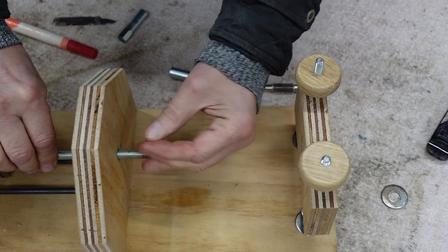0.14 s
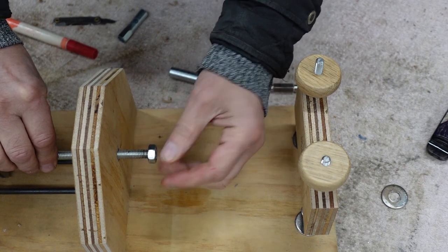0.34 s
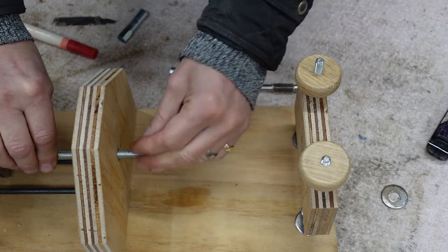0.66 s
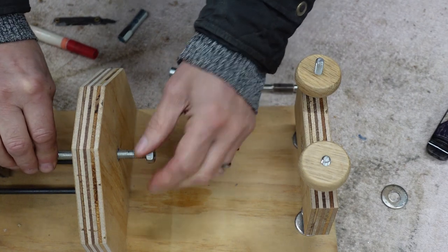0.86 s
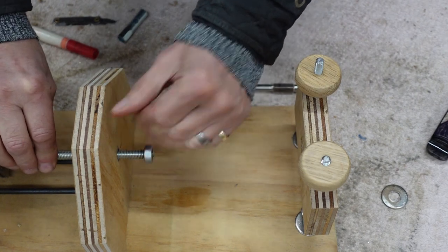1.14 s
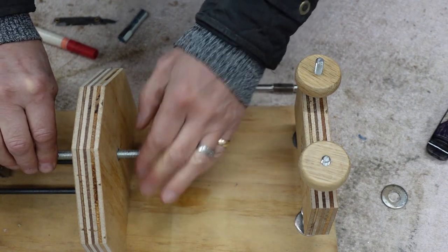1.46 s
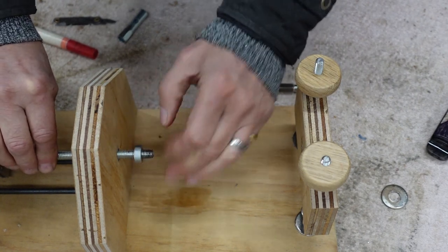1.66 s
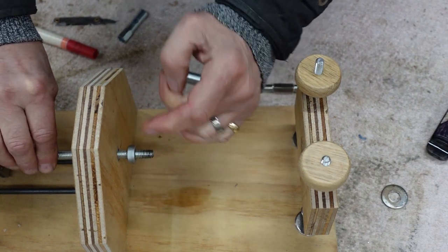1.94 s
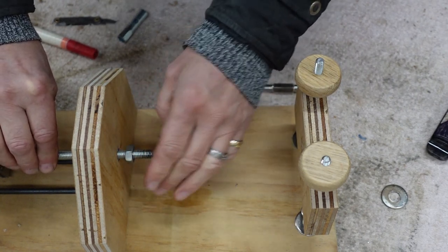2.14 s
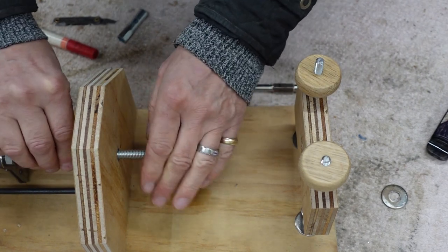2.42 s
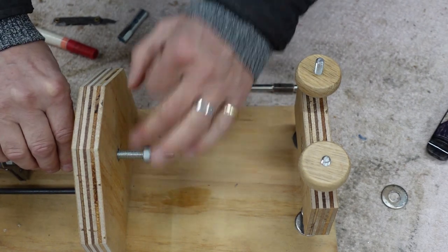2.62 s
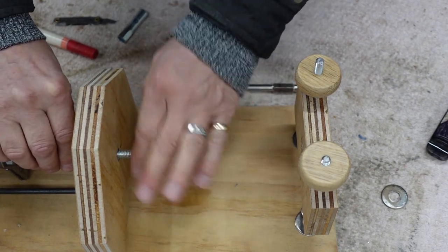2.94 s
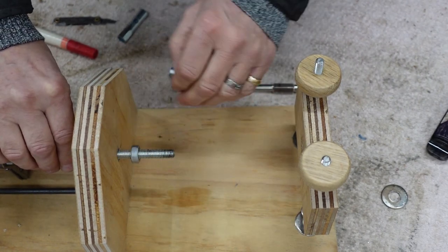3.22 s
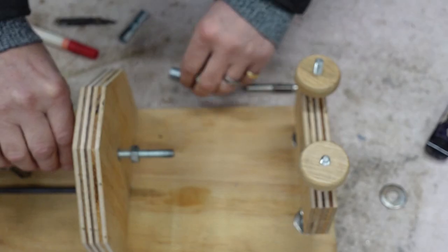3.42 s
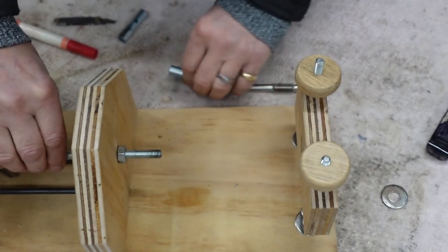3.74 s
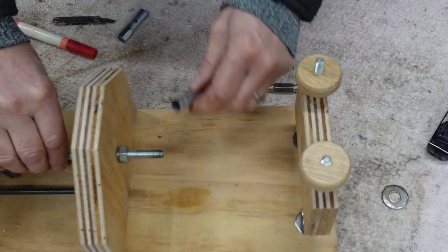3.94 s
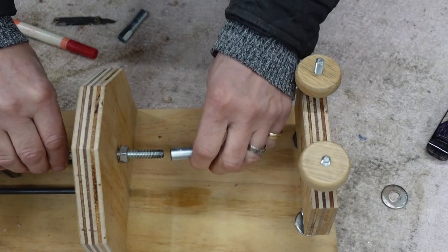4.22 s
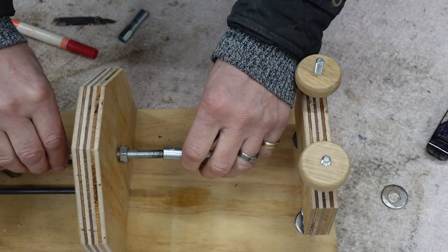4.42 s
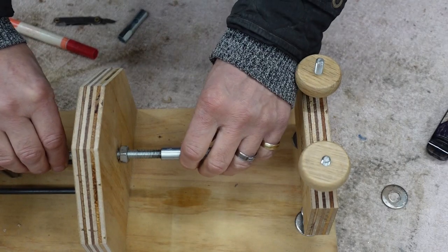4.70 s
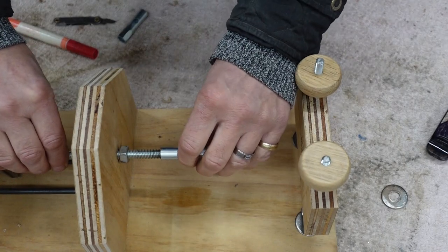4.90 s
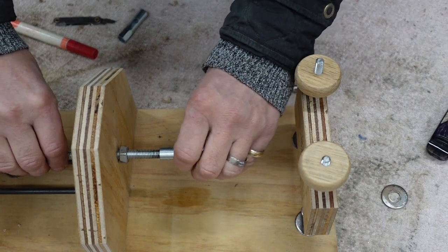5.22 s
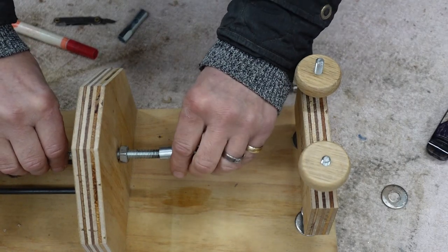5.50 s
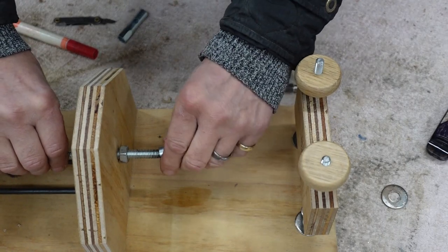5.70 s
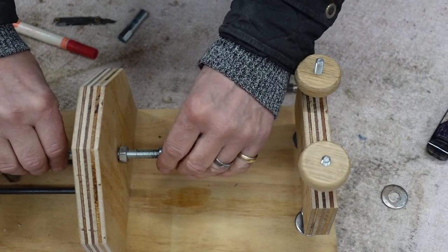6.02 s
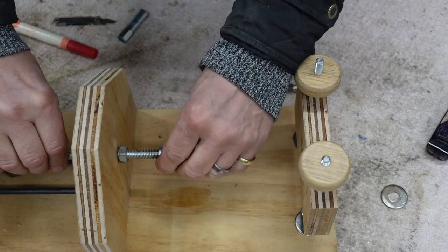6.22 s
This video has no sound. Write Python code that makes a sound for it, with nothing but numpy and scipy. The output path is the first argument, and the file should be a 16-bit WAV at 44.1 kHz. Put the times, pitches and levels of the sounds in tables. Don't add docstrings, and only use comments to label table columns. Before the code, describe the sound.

Bursts of metallic chatter from a nut spinning on a rod, each a brief pitched whirr with wooden knocks and crisp ticks. They peak before two seconds, then pause for clicks and gritty rubs. Lower, looser spins follow, then a hard click and quiet handling, ending with a sharp steel clack. Close stereo microphones, short live echoes, soft room noise.

```python
import sys
import numpy as np
from scipy import signal
from scipy.fft import rfft, irfft, next_fast_len
from scipy.io import wavfile

SR = 44100
rng = np.random.default_rng(int(sys.argv[2]) if len(sys.argv) > 2 else 0)


def convert_level_to_amplitude(level_db):
    exponent = np.asarray(level_db, float) / 20
    return 10 ** exponent


def file_out(sig):
    cols = np.atleast_2d(sig).T
    lim = np.clip(cols, -1, 1)
    pcm = np.round(lim * 32767).astype(np.int16)
    wavfile.write(sys.argv[1], SR, pcm)


N = 280035

# pitch_hz, width_hz, level_db
BOARDS = [(650, 136, -2.5), (880, 53, -13.5), (1326.5, 63, 5), (1597, 340, -4)]
# pitch_hz, width_hz, level_db
STEEL_LOW = [(2233, 400, 6), (2735, 400, 9.5), (3024, 1010, 6)]
STEEL_MAIN = [(4047, 180, -9.5), (4855, 300, 6.5), (5490, 210, -41)]
STEEL_HIGH = [(6040, 1500, -5.5), (6340, 650, 4), (7686, 440, 1.5)]
STEEL_TOP = [(8770, 680, -3.5), (9880, 450, -4.5), (10480, 1040, -0.5), (14730, 910, -11.5)]


def evened(x):
    return x / np.sqrt(np.mean(x ** 2) + 1e-20)


def peaked(x, db):
    return convert_level_to_amplitude(db) * x / abs(x).max()


def read(points, hz):
    f, value = np.transpose(points)
    return np.interp(np.log(hz + 1), np.log(f + 1), value)


def coloured(x, db_table, share):
    size = next_fast_len(x.shape[-1])
    gain = convert_level_to_amplitude(share * read(db_table, np.fft.rfftfreq(size, 1 / SR)))
    return irfft(rfft(x, size) * gain, size)[..., :x.shape[-1]]


def add(mix, s, sound):
    part = mix[..., round(s * SR):][..., :sound.shape[-1]]
    part += sound[..., :part.shape[-1]]


def mode(x, hz, width):
    r = np.exp(-np.pi * abs(width) / SR)
    push = [(1 - r * r) / 2, 0, (r * r - 1) / 2]
    return signal.lfilter(push, [1, -2 * r * np.cos(2 * np.pi * hz / SR), r * r], x)


def steep(x, hz, width, skirt=2.8):
    return mode(mode(x, hz, width), hz, skirt * width)


def resonate(x, hz, width):
    turn = np.exp(2j * np.pi * np.cumsum(hz * np.ones(len(x))) / SR)
    r = np.exp(-np.pi * abs(width) / SR)
    return 2 * (turn * signal.lfilter([1 - r], [1, -r], x / turn + 1e-18)).real


def body(x, modes):
    return sum((-1) ** k * convert_level_to_amplitude(db) * steep(x, f, w) for k, (f, w, db) in enumerate(modes))


def blow(contact_s, scuff=0.41):
    t = np.arange(2000) / SR
    rough = rng.standard_normal(len(t)) * np.sqrt(t) * np.exp(-t / contact_s)
    return signal.unit_impulse(len(t), idx=12) + scuff * rough / abs(rough).max()


def stroke(t, start, length, db, hz, loss_db):
    attack_s, release_db_per_s = 0.03, 370
    gone = np.clip((t - start) / length, 0, 1)
    rise = np.clip((t - start) / attack_s, 0, 1)
    level_db = db - loss_db * gone - release_db_per_s * np.maximum(t - start - length, 0)
    return (rise * convert_level_to_amplitude(level_db)) ** 2, hz, gone


def hand():
    # start_s, length_s, level_db, rod_note_hz, loss_by_end_db
    spins = [(0.001, 0.063, -52, 730, 0.5), (0.197, 0.089, -41.5, 840, -1.5),
             (0.594, 0.17, -43.5, 814, -5.5), (0.726, 0.092, -37, 844, 9), (1.064, 0.12, -39.5, 876, -3.5),
             (1.173, 0.21, -33.5, 910, 4.5), (1.513, 0.32, -28, 940, 8.5), (1.838, 0.26, -29.5, 955, 7.5),
             (2.137, 0.093, -41.5, 854, 11), (2.603, 0.49, -41.5, 612, 7), (2.995, 0.24, -40, 598, 12),
             (3.217, 0.13, -49.5, 530, 6.5)]
    # start_s, length_s, level_db, rod_note_hz, thump_db
    grips = [(1.009, 0.082, -48.5, 850, -42), (2.257, 0.09, -37, 806, -9), (3.507, 0.15, -49, 500, -13.5),
             (3.762, 0.093, -64, 700, -14), (3.917, 0.075, -61.5, 700, -9),
             (4.425, 0.174, -59.5, 640, -1.5), (4.74, 0.03, -39, 788.4, -8.5), (4.786, 0.28, -61, 670, -22),
             (5.192, 0.11, -56.5, 605, -3.5), (5.686, 0.029, -52, 620, -2.5), (5.888, 0.12, -59, 600, -4.5)]
    rest_db, rest_hz = -77, 700
    climb = 0.22
    spin_steel_db, spin_dulls = -9, 1.59
    spin_rumble_db, spin_thump_db = -15, -32
    loose_db_per_octave = 10.5
    grip_steel_db, grip_rumble_db, grip_loss_db = -11.5, -3, 1.5
    t = np.arange(0, N / SR + .01, .001)
    flat = np.ones(len(t))
    power = [convert_level_to_amplitude(2 * rest_db) * flat]
    colour = [[rest_hz * flat, -16 * flat, grip_rumble_db * flat, -8 * flat]]
    for row in spins:
        p, hz, gone = stroke(t, *row)
        loss_db = row[-1]
        loose_db = loose_db_per_octave * np.log2(950 / hz) * flat
        note = hz * (1 + climb * np.log2(hz / 620) * (gone - .5))
        steel_db = spin_steel_db - spin_dulls * (loss_db * gone - min(loss_db, 0)) + loose_db
        power.append(p)
        colour.append([note, steel_db, spin_rumble_db + loose_db, spin_thump_db * flat])
    for *row, thump_db in grips:
        p, hz, gone = stroke(t, *row, grip_loss_db)
        power.append(p)
        colour.append([hz * flat, grip_steel_db * flat, grip_rumble_db * flat, thump_db * flat])
    total = np.sum(power, axis=0)
    mean = np.einsum("st,sct->ct", power, colour) / total
    return [np.interp(np.arange(N) / SR, t, c) for c in (10 * np.log10(total), *mean)]


def chatter(level_db, rod_hz, bright_db, rumble_db, thump_db, per_s=380, spread_db=2.5, scrape=0.36):
    # pitch_hz, width_hz, level_db
    rumble_modes = [(253, 41, -1.5), (335.7, 43.6, -1), (458, 89, 3.5)]
    sizes = convert_level_to_amplitude(spread_db * np.minimum(rng.exponential(1, N), 3)) * (rng.random(N) < per_s / SR)
    blows = evened(sizes * rng.choice([-1., 1.], N)) + scrape * rng.standard_normal(N)
    grit = signal.lfilter([1], [1, -np.exp(-1 / (0.0018 * SR))], sizes) * rng.standard_normal(N)
    grit = evened(grit) + 0.7 * rng.standard_normal(N)
    shaking = resonate(blows, rod_hz, 427)
    ridge = convert_level_to_amplitude(3) * (620 / rod_hz) ** 4 * resonate(shaking, rod_hz, 70)
    boards = convert_level_to_amplitude(0.5) * body(shaking, BOARDS) * (rod_hz / 900) ** 0.22
    low = evened(ridge + resonate(shaking, rod_hz, 260) + boards)
    grip_db = 12 * np.log2(rod_hz / 900) - 6
    steel = convert_level_to_amplitude(grip_db) * body(grit, STEEL_LOW) + body(grit, STEEL_MAIN)
    steel = evened(steel + convert_level_to_amplitude(-6.0) * body(grit, STEEL_HIGH) + convert_level_to_amplitude(-15.5) * body(grit, STEEL_TOP))
    rumble = convert_level_to_amplitude(rumble_db) * evened(body(blows, rumble_modes))
    thump = convert_level_to_amplitude(thump_db) * evened(steep(blows, 154.4, 70))
    return convert_level_to_amplitude(level_db - 3.5) * (low + convert_level_to_amplitude(bright_db) * steel + rumble + thump)


def knocks(rod_hz):
    # start_s, peak_db
    slap_table = [(0.222, -35), (0.261, -36.5), (0.595, -36.5), (0.639, -33.5), (0.756, -31.5), (0.83, -46),
                  (1.108, -32.5), (1.168, -29), (1.243, -27.5), (1.289, -26), (1.321, -30), (1.541, -26.5),
                  (1.719, -25.5), (1.859, -17.5), (1.917, -21.5), (1.982, -19.5), (2.088, -23.5),
                  (2.641, -39), (2.693, -29), (2.789, -37.5), (2.813, -33), (2.839, -30), (2.945, -31),
                  (3.026, -29.5), (3.069, -31), (3.118, -37), (3.15, -44), (3.194, -32), (3.265, -35)]
    # start_s, peak_db, pitch_hz
    bumps = [(0.043, -44, 650), (0.549, -49, 695), (1.025, -35, 820), (1.497, -29.5, 770),
             (2.257, -36.5, 1030), (2.285, -33.5, 530), (2.592, -46, 692), (3.522, -36.5, 1590),
             (3.583, -36, 470), (4.456, -42.5, 705), (4.496, -44.5, 590), (4.546, -40, 575),
             (4.761, -32.5, 650), (5.214, -37, 1024), (5.249, -39, 371), (5.421, -44, 1510),
             (5.7, -47, 403), (5.96, -44, 580), (6.171, -45, 604), (6.2, -50.5, 218)]
    detune = 0.04
    thud_hz, thud_db = 190, -24
    out = np.zeros(N)
    chance = rng.uniform(-1, 1, len(slap_table))
    slaps = [(s, db, rod_hz[round(s * SR)] * (1 + detune * c)) for (s, db), c in zip(slap_table, chance)]
    push = signal.unit_impulse(1800)
    for s, db, hz in slaps + bumps:
        shaking = mode(mode(push, hz, 780), hz, 430)
        note = peaked(mode(shaking, hz, 115) + convert_level_to_amplitude(-11) * body(shaking, BOARDS), db - 1.0)
        thud = peaked(steep(push, thud_hz, 172), db + thud_db)
        add(out, s, rng.choice([-1., 1.]) * (note + thud))
    return out


def ticks(rod_hz):
    # start_s, peak_db, top_end_db
    thread_table = [(0.2214, -28.5, -15.5), (0.2618, -24.5, -20), (0.7457, -31, -23), (1.1588, -22.5, -25),
                    (1.2491, -27.5, -23), (1.5995, -16.5, -8.5), (1.6351, -25, -7), (1.6774, -37, -8),
                    (1.727, -25.5, -12.5), (1.8585, -19.5, -11.5), (2.0136, -24, -8), (2.0557, -26.5, -8),
                    (2.63, -36, -4), (2.6471, -24, -7), (2.7322, -36, -2), (2.751, -31, -12),
                    (2.7881, -32.5, -11), (2.8384, -26, -15.5), (2.9547, -34, -35), (2.9936, -23, -19),
                    (3.032, -19, -18), (3.0455, -19, -10), (3.093, -24.5, -23), (3.1417, -28.5, -34),
                    (3.1707, -24, -21), (3.1966, -30, -25), (3.2777, -36.5, -47)]
    # start_s, peak_db, low_note_hz, low_note_db, top_end_db
    part_ticks = [(0.602, -47, 2800, 5, -30), (0.6402, -40.5, 2250, 6, -40), (1.0248, -22, 2210, -8, -21.5),
                  (1.497, -22.5, 3140, -2, -18), (2.259, -34, 2650, 2, -22), (2.2706, -26, 3020, 5.5, -15),
                  (2.2943, -19, 2780, -24, -19), (2.3659, -16, 3380, -5, -18.5),
                  (2.59, -40.5, 2100, 1, -26), (3.5203, -22.5, 3140, 2.5, -13.5),
                  (3.676, -11, 2110, -16.5, -33), (4.007, -46.5, 3500, -6, -15), (4.456, -47, 2940, 4, -35),
                  (4.5461, -41, 2780, 2, -35), (4.753, -39, 3640, -1, -32), (4.772, -21, 2850, -2, -23.5),
                  (5.1943, -43.5, 2900, -2.5, -27), (5.2134, -52, 1960, 7, -8),
                  (5.249, -24.5, 2780, -2, -15.5), (5.4194, -28, 3280, 0.5, -35),
                  (5.6982, -38, 2780, 0.5, -17), (5.91, -47, 3300, 5.5, -38), (6.043, -50, 2850, -2, -34)]
    thread_hz, detune, thread_low_db = 2850, 0.076, -9
    high_start_db, high_share = 1, 0.51
    crack_db = -15.5
    out = np.zeros(N)
    chance = rng.uniform(-1, 1, (len(thread_table), 2))
    thread = []
    for (s, db, top_db), (a, b) in zip(thread_table, chance):
        hz = thread_hz * (900 / rod_hz[round(s * SR)]) ** 0.43 * (1 + detune * a)
        thread.append((s, db, hz, thread_low_db + 4 * b, top_db))
    for s, db, hz, low_db, top_db in thread + part_ticks:
        high_db = high_start_db + high_share * top_db
        force = blow(0.0023)
        low = peaked(steep(force, hz, 260) + convert_level_to_amplitude(-14) * body(force, STEEL_LOW), low_db)
        high = peaked(body(force, STEEL_HIGH), high_db) + peaked(body(force, STEEL_TOP), top_db)
        rest = np.sqrt(max(1 - convert_level_to_amplitude(2 * low_db) - convert_level_to_amplitude(2 * high_db), .03))
        main = rest * peaked(body(force, STEEL_MAIN), 0)
        crack = peaked(steep(force, 3100, 7500, 0.51), crack_db + 0.45 * top_db)
        add(out, s, convert_level_to_amplitude(db - 9.0) * (low + main + high + crack))
    return out


def sleeve(grind_s=0.007, grind_db=-4):
    # start_s, peak_db
    hits = [(6.171, -11.5)]
    # pitch_hz, width_hz, level_db
    sleeve_modes = [(988, 120, -15), (1590, 310, -4), (2160, 590, -2), (3155, 300, 4.5), (3780, 240, -10),
                    (4460, 260, -5.5), (5086, 250, -3.5), (5760, 380, -6), (6404, 220, -3.5),
                    (7620, 620, -7.5), (8670, 260, -14), (10100, 840, -23), (12100, 1600, -23),
                    (14840, 960, -9)]
    out, turns = np.zeros(N), rng.standard_normal(2000)
    for s, db in hits:
        clack = np.zeros(SR // 20)
        for (hz, width, g), turn in zip(sleeve_modes, turns):
            u = np.arange(0, 1, width / 1.63 / SR)
            swell = u ** .5 * (1 - u) ** 1.2
            tone = np.sin(2 * np.pi * (hz * np.arange(len(u)) / SR + turn))
            add(clack, 0, convert_level_to_amplitude(g) * swell * tone)
        u = np.arange(0, 1, 1 / (grind_s * SR))
        grind = steep(np.sin(np.pi * u) * turns[-len(u):], 6000, 14000, 1.2)
        add(out, s, peaked(clack, db - 6))
        add(out, s, peaked(grind, db - 13.5 + grind_db))
    return out


def drag():
    # start_s, length_s, level_db, pitch_hz
    slides = [(2.232, 0.15, -45.5, 2700), (2.272, 0.093, -44, 1420), (2.5, 0.12, -63, 1760),
              (3.522, 0.15, -54.5, 950), (4.75, 0.05, -47.5, 1370), (4.8, 0.15, -64, 1750),
              (3.545, 0.15, -57, 2880), (4.8, 0.039, -59.5, 1360), (4.763, 0.022, -60, 12400)]
    out = np.zeros(N)
    for s, length, db, hz in slides:
        u = np.arange(0, 1, 1 / (length * SR))
        grit = rng.standard_normal(SR // 2)[:len(u)] ** 3
        rub = evened(resonate(resonate(grit, hz, 190), hz, 700))
        add(out, s, convert_level_to_amplitude(db) * np.sin(np.pi * u) ** 0.8 * rub)
    return out


def chimes():
    # start_s, peak_db, fade_s (time to drop 60 dB)
    rings = [
        (2.2948, -55.5, 0.92),
        (2.366, -40.5, 0.29),
        (3.675, -47, 0.31),
    ]
    nut_hz = (11172, 11339)
    nut_db = (0, -2)
    out, t = np.zeros(N), np.arange(SR // 2) / SR
    pair = sum(convert_level_to_amplitude(g) * np.sin(2 * np.pi * hz * t) for hz, g in zip(nut_hz, nut_db))
    for s, db, t60 in rings:
        add(out, s, peaked(pair * convert_level_to_amplitude(-60 * t / t60) * np.minimum(t / .001, 1), db + 2))
    return out


def shop(x, first_s=.0055):
    # pitch_hz, fade_s (time to drop 60 dB)
    fade = [(150, 0.49), (500, 0.46), (1500, 0.38), (4000, 0.34), (8000, 0.33), (14000, 0.27)]
    # pitch_hz, side_db
    spread = [(200, -12), (700, -15), (1500, -12), (3000, -8), (6000, -3), (12000, -3)]
    taps = np.zeros((2, SR))
    grid = np.arange(round(first_s * SR), SR - 20, 20)
    at = grid + rng.integers(0, 20, (2, len(grid)))
    np.put_along_axis(taps, at, rng.choice([-1., 1.], at.shape), 1)
    hz, t, z = signal.stft(taps, SR, nperseg=256)
    mid, side = signal.istft(z * convert_level_to_amplitude(-60 * t / read(fade, hz)[:, None]), SR, nperseg=256)[1]
    side = coloured(side, spread, 0.85)
    tail = np.array([mid + side, mid - side]) / np.linalg.norm(mid)
    return signal.fftconvolve(x[None], tail, axes=1)[:, :N]


def air():
    # pitch_hz, level_db (per Hz)
    noise_colour = [(18, -84), (30, -52), (86, -22), (170, -16.5), (204, -10.5), (273, -14), (780, -7.5),
                    (962, -15.5), (1160, -12.5), (1280, -12.5), (3770, -22), (13700, -35), (16000, -29.5)]
    # pitch_hz, likeness (1 same, -1 opposite)
    likeness = [(60, 0.69), (240, -0.27), (950, -0.26), (3770, -0.039), (15000, 0.34)]
    air_db, hum_hz, hum_db = -62.5, 194.6, -77
    frames, hz = N // 256 + 5, np.fft.rfftfreq(1024, 1 / SR)
    a, b, c, d = rng.standard_normal((frames, 513, 4)).T
    same = np.clip(read(likeness, hz), -1, 1)[:, None]
    left = a + 1j * b
    right = same * left + np.sqrt(1 - same ** 2) * (c + 1j * d)
    z = np.array([left, right]) * convert_level_to_amplitude(read(noise_colour, hz)[:, None])
    noise = evened(signal.istft(z, nperseg=1024, noverlap=768)[1][:, :N])
    hum = evened(resonate(rng.standard_normal(N), hum_hz, 2.7))
    return convert_level_to_amplitude(air_db) * noise + convert_level_to_amplitude(hum_db) * hum


def scene():
    # pitch_hz, left_minus_right_db
    lean = [(200, -1), (1000, 1), (2500, 2), (5000, 2.5), (9000, 3), (13000, 2.5)]
    level_db, rod_hz, *colour_db = hand()
    clicks = ticks(rod_hz) + sleeve() + drag()
    rattle = chatter(level_db, rod_hz, *colour_db) + knocks(rod_hz)
    rings = chimes()
    echoes = shop(convert_level_to_amplitude(-2.5) * clicks + convert_level_to_amplitude(-4.0) * rattle + convert_level_to_amplitude(-5) * rings)
    near = clicks + rattle + rings + echoes
    return np.array([coloured(ear, lean, share) for ear, share in zip(near, (.5, -.5))]) + air()


def band_limit(x):
    return signal.sosfilt(signal.butter(12, 16500, fs=SR, output="sos"), x)


def record(dry):
    heard = signal.sosfilt(signal.butter(2, 85, "high", fs=SR, output="sos"), dry)
    heard = signal.sosfilt(signal.butter(12, 15300, fs=SR, output="sos"), heard)
    return band_limit(heard)


dry = scene()
out = record(dry)
file_out(out)
```